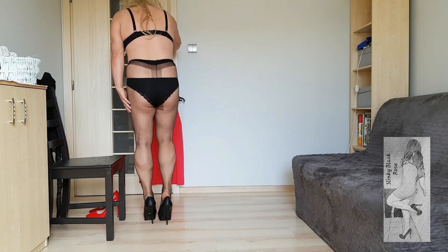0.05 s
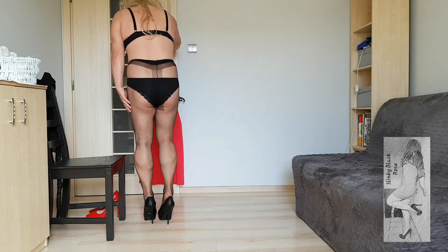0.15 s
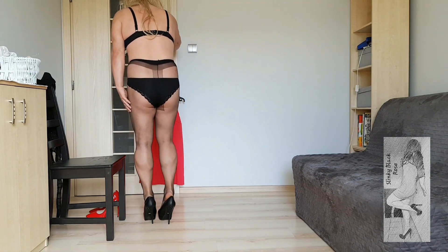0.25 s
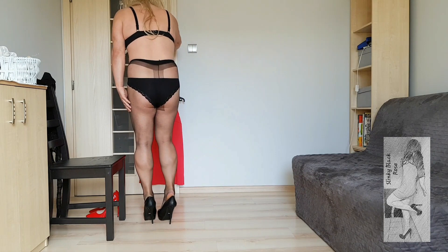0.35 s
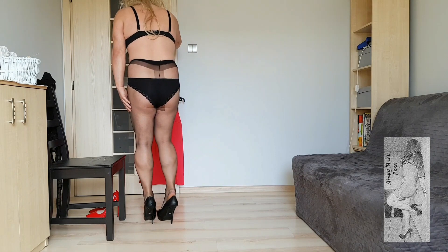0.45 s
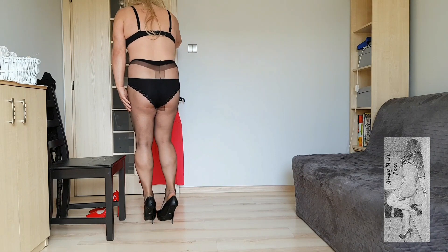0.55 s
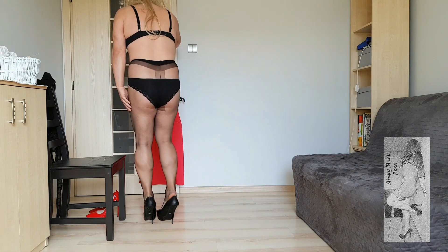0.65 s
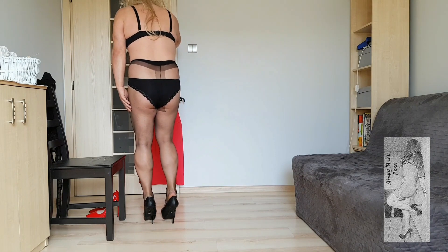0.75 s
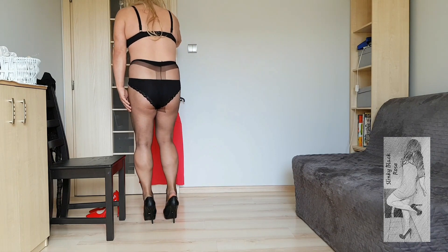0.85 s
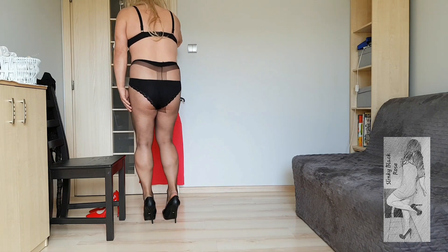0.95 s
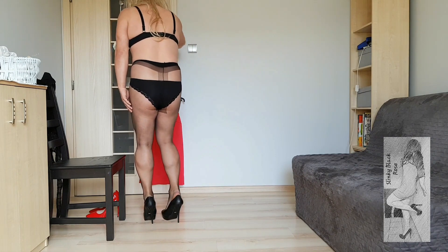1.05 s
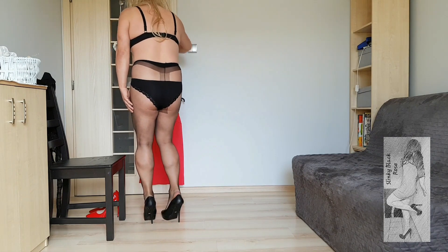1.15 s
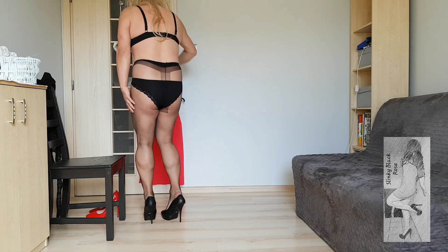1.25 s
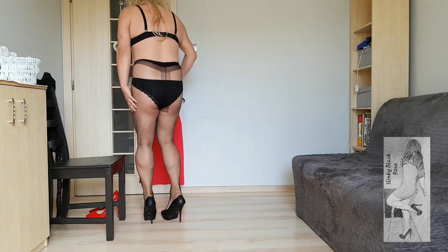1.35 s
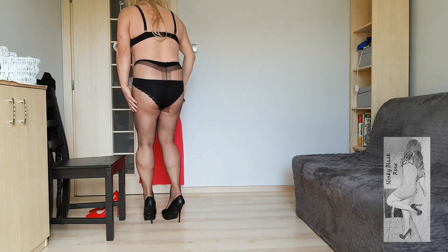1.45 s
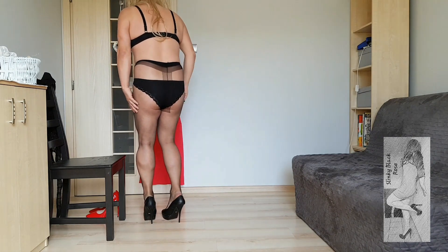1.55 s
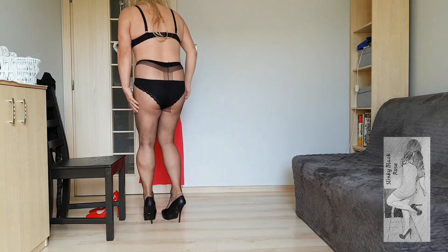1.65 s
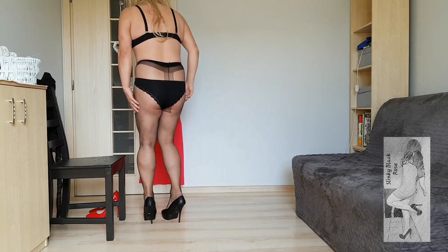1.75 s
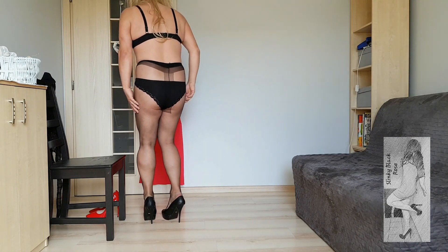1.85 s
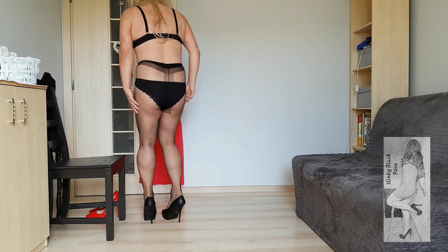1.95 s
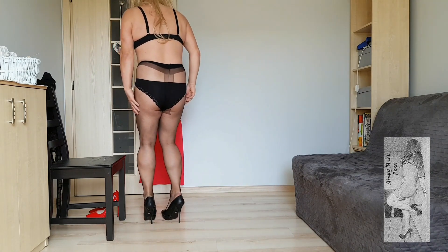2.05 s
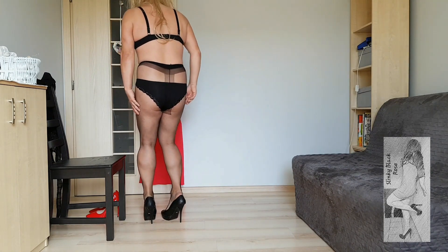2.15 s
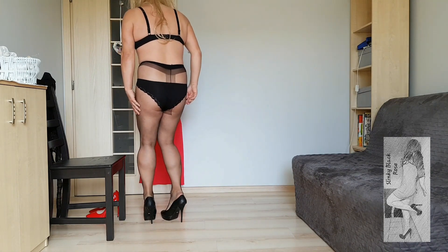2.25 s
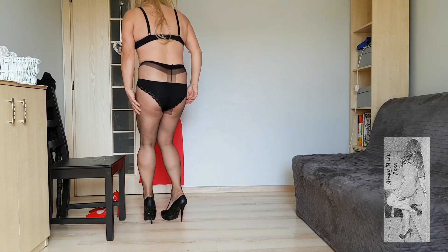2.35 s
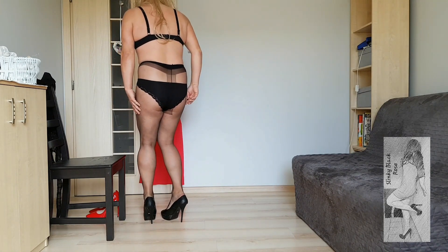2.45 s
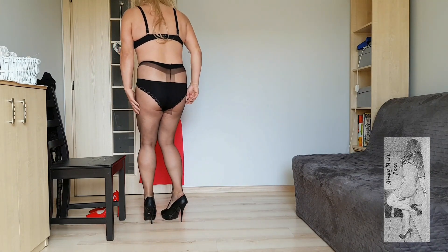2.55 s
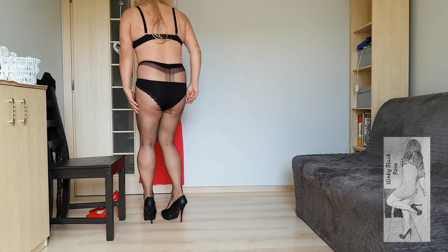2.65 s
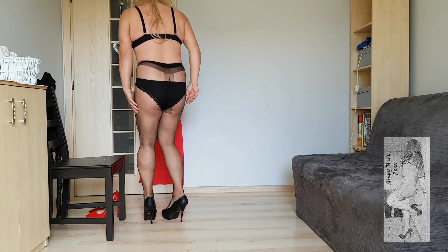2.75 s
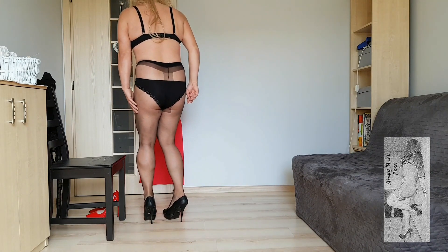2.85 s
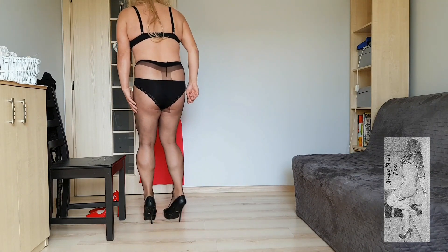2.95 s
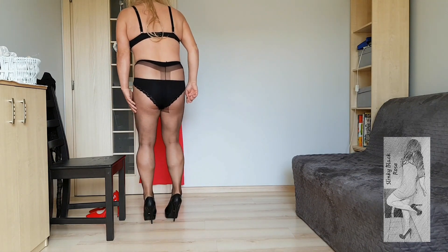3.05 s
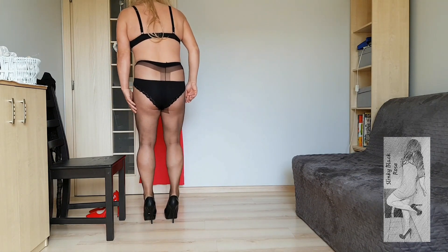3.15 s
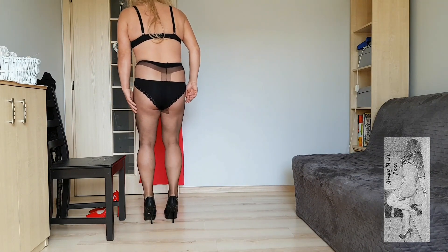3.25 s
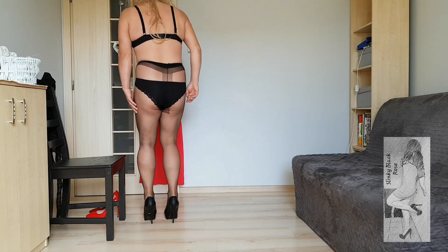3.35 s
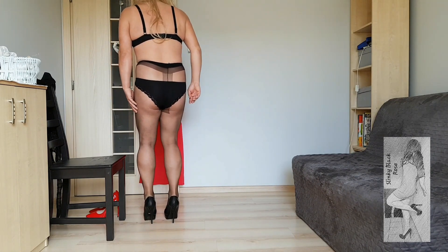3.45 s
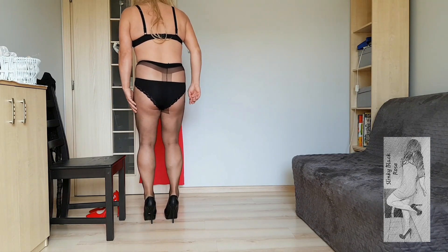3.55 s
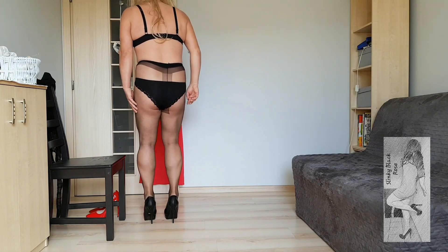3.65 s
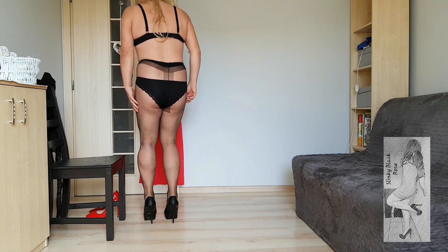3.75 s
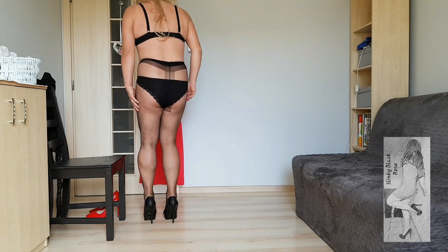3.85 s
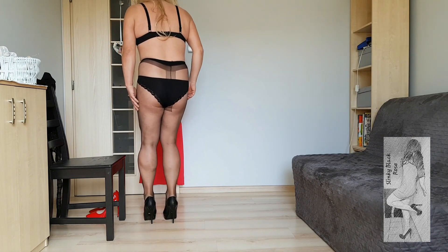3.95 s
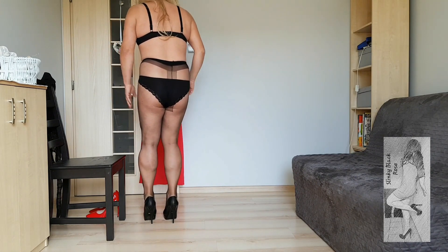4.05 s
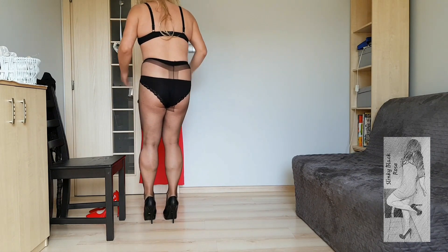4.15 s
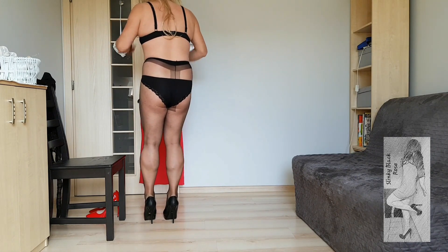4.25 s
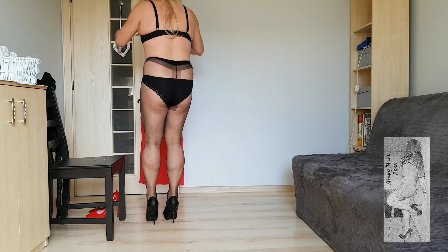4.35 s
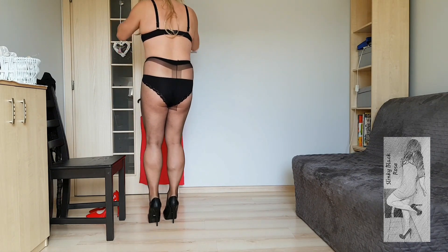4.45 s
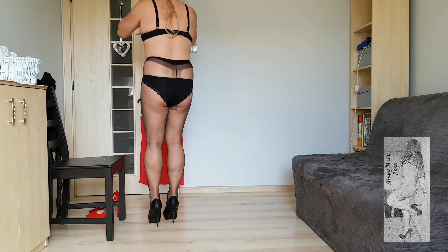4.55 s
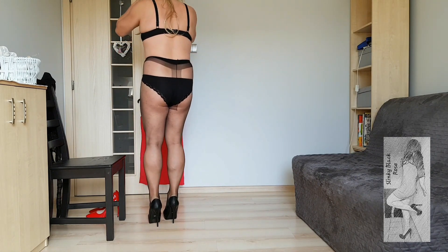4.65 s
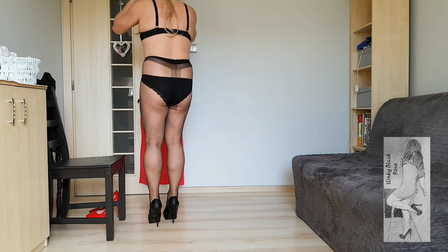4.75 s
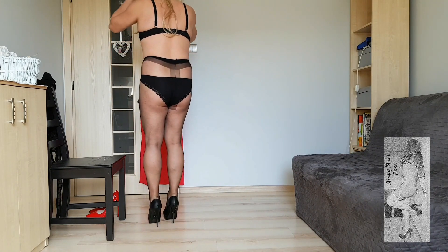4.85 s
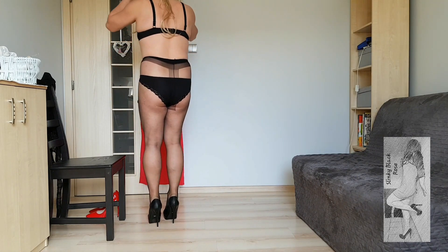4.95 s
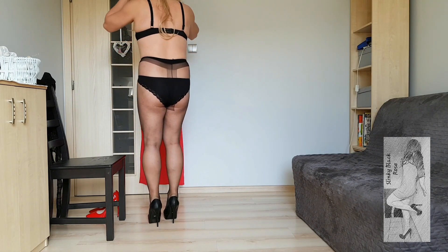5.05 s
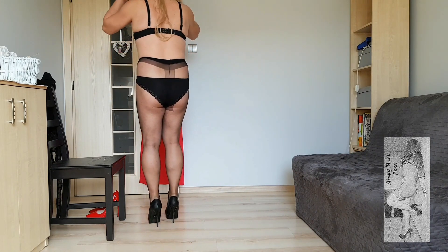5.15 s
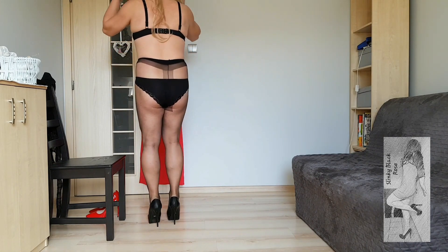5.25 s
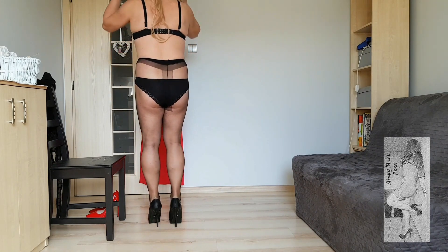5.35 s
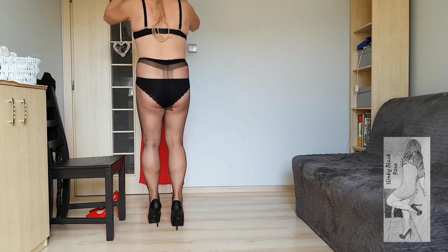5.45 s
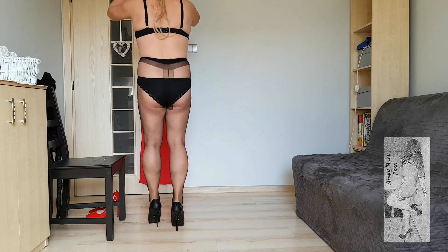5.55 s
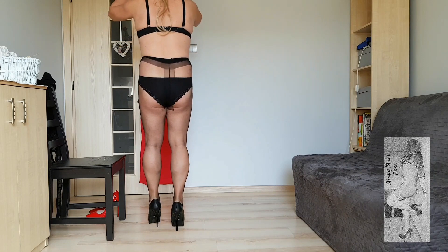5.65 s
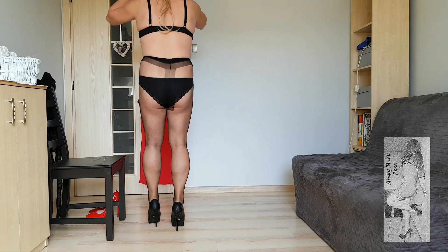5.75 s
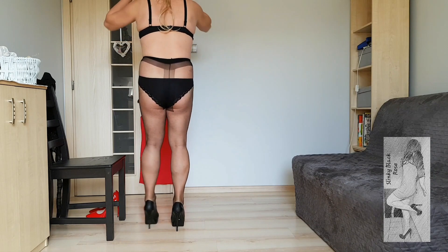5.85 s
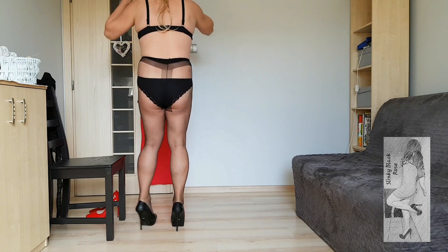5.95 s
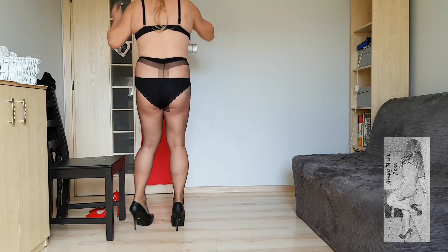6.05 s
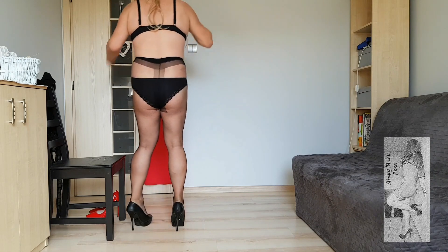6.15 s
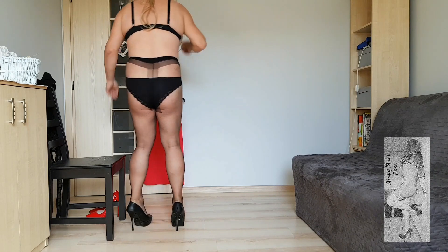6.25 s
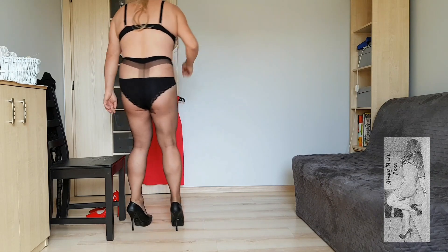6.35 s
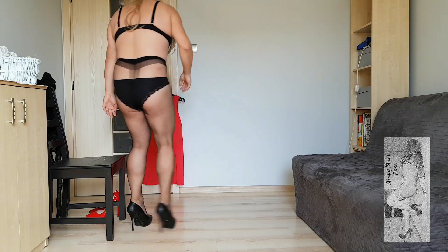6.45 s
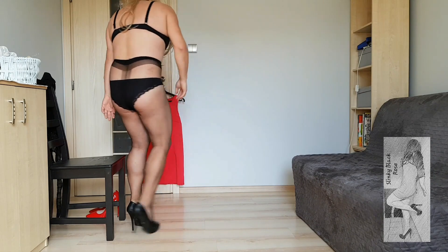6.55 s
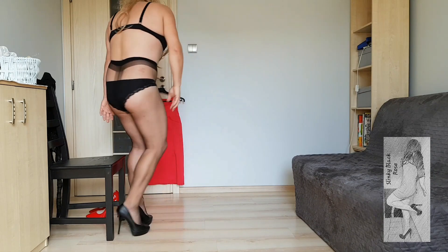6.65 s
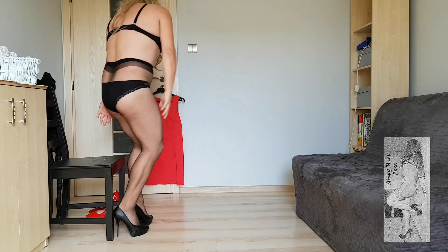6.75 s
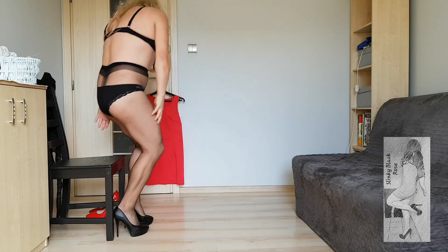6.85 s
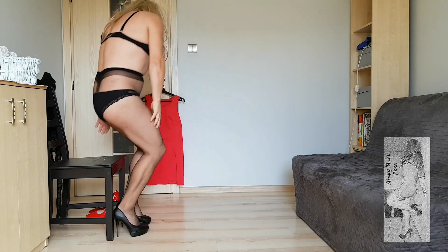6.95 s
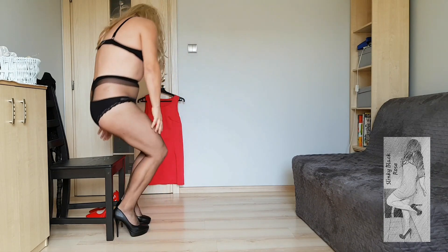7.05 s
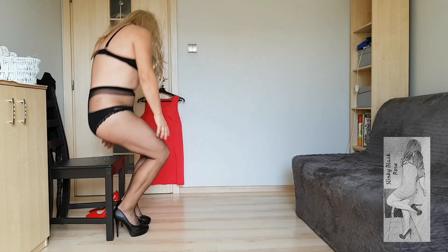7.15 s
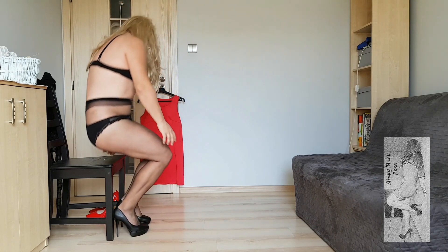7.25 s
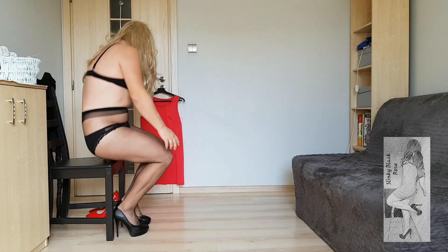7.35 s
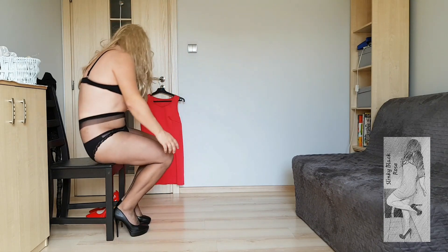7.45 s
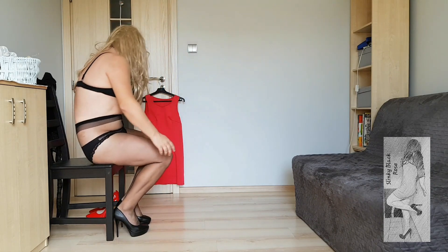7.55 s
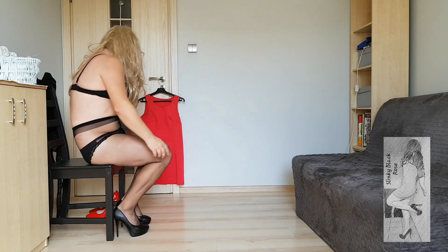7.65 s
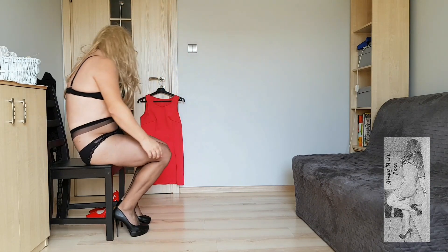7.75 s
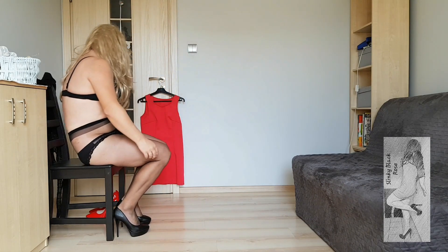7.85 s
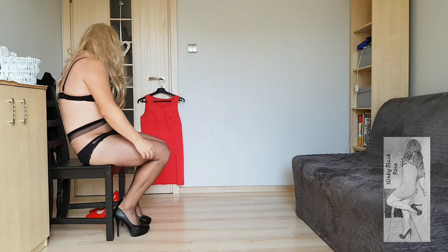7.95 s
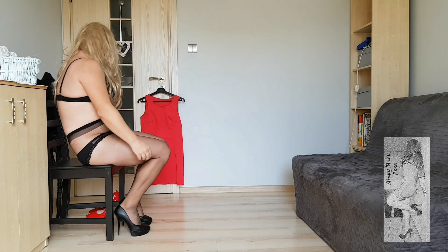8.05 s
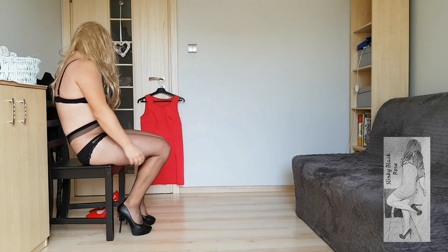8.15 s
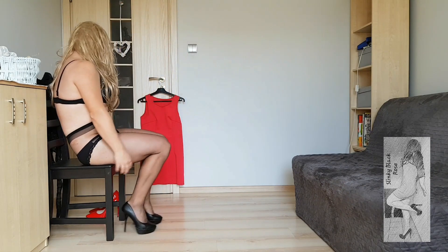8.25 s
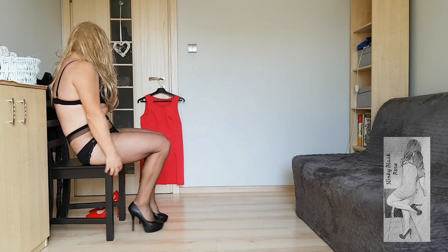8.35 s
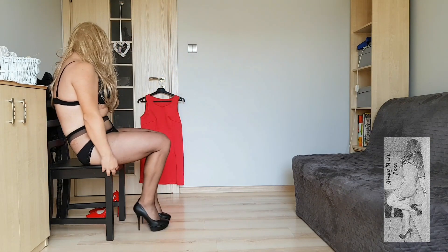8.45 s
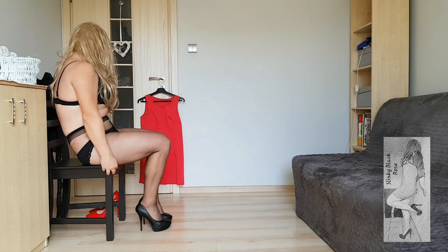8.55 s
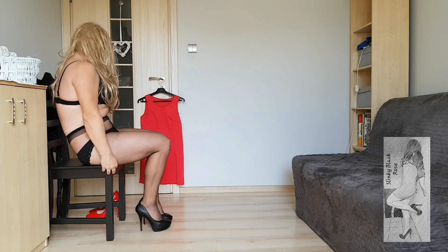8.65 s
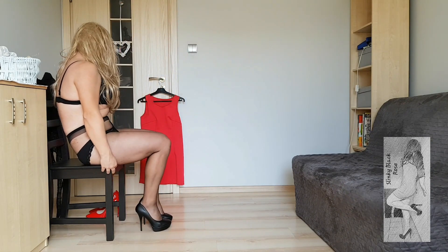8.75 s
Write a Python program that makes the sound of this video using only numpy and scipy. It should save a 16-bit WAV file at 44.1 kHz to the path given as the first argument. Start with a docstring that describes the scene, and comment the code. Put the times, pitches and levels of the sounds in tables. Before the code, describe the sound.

Platform high heels scuff, squeak and knock irregularly on a laminate floor in a small bare room, then a wooden chair groans as someone sits.

```python
"""In a small bare room with a laminate floor, platform high heels shift and step.
Each blow excites damped modes of floor, board and shoe, and the heel tip adds a broadband crack.
Soles scuff, squeak and roll by stick-slip friction; light brushing, probably stockings, only hisses.
Then the wearer sits down: a wooden chair groans and slides, and the last heel blows follow.
Reflections, a diffuse tail and standing waves colour every contact; faint room air lies beneath."""
import sys
import numpy as np
from scipy import signal
from scipy.fft import rfft, irfft, next_fast_len
from scipy.io import wavfile

SR = 44100
rng = np.random.default_rng(int(sys.argv[2]) if len(sys.argv) > 2 else 0)


def pcm_store(signal):
    """Save signal as 16-bit PCM."""
    levels = np.round(np.clip(np.atleast_2d(signal), -1, 1) * 32767)
    wavfile.write(sys.argv[1], SR, levels.astype(np.int16).T)


N = 388124  # samples

# shoe blows: start_s, knock_level_db, then relative to the knock: thud_db, shoe_ring_db
STEPS = [(.065, -64.5, -6, 9.5), (.14, -63.5, 0.5, 3.5), (.66, -57, -15, 8.5), (.906, -56.5, -3.5, -0.5),
         (1.063, -46, 3, 2.5), (1.759, -62.5, -11, -9), (1.982, -57, 1, -1), (2.145, -60.5, -8, 1.5),
         (2.196, -59.5, -1, 8), (2.484, -60, -10, -21), (2.697, -58.5, -4, -28), (3.087, -59.5, 2, -5),
         (3.27, -57.5, -7, -1), (3.311, -25.5, -6.5, -1), (3.643, -72.5, -5, 10.5),
         (3.686, -71.5, -12, 13.5), (3.816, -70.5, 1, 12), (4.136, -68.5, -3, 8.5), (4.434, -74.5, -13, 8),
         (4.615, -59, -4, 2.5), (4.6832, -35.5, -3, -3.5), (5.353, -66.5, -3, 5), (5.583, -52, 2, 6),
         (5.696, -49.5, -14.5, -20), (5.918, -61.5, 8.5, 4), (6.2804, -40, -0.5, -2.5),
         (6.285, -36, -8, -22), (6.548, -52.5, -2, -10), (6.762, -45, -1.5, 0), (6.975, -49.5, 2.5, -2.5),
         (7.104, -49, 1, -16), (7.99, -67, 3, -4), (8.693, -47, 3, -6), (8.702, -36, -2.5, -6.5),
         (8.705, -31, -19, -12)]
# soft treads that flex the floor: start_s, level_db
TREADS = [(1.063, -67), (1.981, -56), (2.012, -54), (3.087, -68), (7.104, -66), (8.702, -55)]
# soles scuffing: peak_s, rise_s, fall_s, board_db, grit_db (drag strengths before a common gain)
SCUFFS = [(.676, 0.014, 0.017, -53, -45), (.797, 0.0062, 0.005, -59.5, -53.5),
          (0.949, .021, 0.029, -61.5, -64), (1.16, 0.029, 0.04, -64.5, -66.5),
          (1.768, 0.0043, 0.0095, -72, -60.5), (1.99, 0.0031, .012, -69, -63.5),
          (2.35, .027, .017, -65, -75), (3.02, .03, 0.053, -79, -71.5), (3.315, 0.00073, 0.0018, -52, -49),
          (3.43, .011, 0.026, -55.5, -54.5), (3.7, 0.029, .018, -68, -64.5), (3.88, .019, 0.023, -61, -59),
          (4.655, 0.02, 0.0068, -73, -62.5), (5.607, 0.021, 0.032, -57.5, -55.5),
          (5.948, .022, 0.0054, -55.5, -63.5), (6.57, .013, 0.0071, -52.5, -59),
          (6.78, 0.0098, 0.03, -51.5, -46.5), (6.955, 0.023, 0.0056, -61, -62),
          (7.03, 0.058, 0.029, -70, -65.5), (8.37, 0.082, 0.032, -68, -67)]
# soles squeaking as they twist: start_s, length_s, settled_slip_rate_hz, tone_db, rasp_db (re tone)
SQUEAKS = [(0.636, 0.042, 968, -44, -13), (.66, 0.069, 1607, -52, -22), (0.784, 0.0079, 3680, -51, -17),
           (6.541, 0.039, 555.6, -46, -10)]
# soles rolling as the weight shifts: start_s, length_s, board_db (before the roll gain), grit_db
ROLLS = [(0, 0.097, -60, -58.5), (.145, .12, -59.5, -65), (0.282, .13, -66, -69.5),
         (0.458, 0.17, -58.5, -69), (1.322, 0.045, -64.5, -75), (1.493, 0.11, -63, -71),
         (2.551, .12, -66, -89), (2.7, 0.14, -64, -75), (2.839, 0.084, -62, -65),
         (8.002, 0.055, -70, -64.5)]
# light brushing, probably stockings: peak_s, rise_and_fall_s, hiss_db (before the common drag gain)
SWISHES = [(.66, 0.01, -52.5), (.797, 0.0073, -61), (1.09, 0.019, -65), (3.05, 0.08, -74), (3.45, .02, -69),
           (3.681, 0.018, -72), (4.19, 0.019, -73), (5.63, 0.042, -70), (6.494, 0.0047, -63.5),
           (7.04, .04, -74), (8.37, 0.13, -77)]
# chair joint slipping under load: start_s, length_s, settled_slip_rate_hz, tone_db, rasp_db (re tone)
GROANS = [(7.481, 0.029, 325.4, -42, -10), (7.647, 0.026, 330.6, -50, -15)]
# chair legs sliding: peak_s, rise_s, fall_s, frame_db, grit_db, hiss_db (before the common drag gain)
CHAIR_SLIDES = [(7.612, 0.002, 0.015, -50, -64, -56.5), (7.668, .015, 0.013, -44, -41, -52.5)]

# modes of the flexing floor, the floor thud, the board, the shoe and the chair frame,
# with strengths relative within each body: pitch_hz, strength_db, t60_s
FLEX_MODES = [(79.5, 10, 0.1), (119.5, 12, 0.1), (172, 0, 0.079)]
THUD_MODES = [(196.6, -8.5, 0.09), (259, -9, 0.19), (314.6, 3, 0.047), (380, -2, 0.015)]
BOARD_MODES = [(414, -25.5, 0.012), (533.5, 4.5, 0.05), (600, 8.5, 0.02), (670, 3.5, 0.038)]
SHOE_MODES = [(736, -9.5, 0.029), (805.6, -1.5, 0.024), (853, -1.5, 0.024), (1010, -7, 0.019),
              (1111, -8, 0.024), (1256, -7.5, 0.025)]
FRAME_MODES = [(1020, 8, 0.019), (1202, 10, 0.015), (1440, 16.5, 0.0074), (1800, 13, 0.0086),
               (2270, 10.5, 0.017), (2957, 5.5, 0.095), (3550, -12, 0.032)]
# relative spectra of the heel tip crack, of gritty friction and of hissing friction: pitch_hz, gain_db
TIP_SPECTRUM = [(600, -39), (1200, 0), (1700, 0.5), (2400, -3.5), (3200, -7.5), (4500, -8.5), (6500, -16.5),
                (9000, -33), (14000, -38)]
GRIT_SPECTRUM = [(200, -13), (500, -11.5), (1200, 0.5), (1800, -2), (2800, -3), (4500, -7.5), (6500, -15.5),
                 (9000, -20), (14000, -21.5)]
HISS_SPECTRUM = [(2000, -53), (4500, 1), (6500, 1), (9000, -2.5), (12500, 2.5), (15000, -11.5)]

# first reflections, relative to the direct path: delay_s, level_db
ECHOES = [(.0045, -10), (.0085, -9), (0.0116, -8), (.016, -9), (0.029, -14), (.038, -7.5)]
# standing waves of the room, relative to one another: pitch_hz, strength_db, t60_s
STANDING = [(116, -12, 0.21), (184.9, 1, 0.38), (215, -3, 0.5), (265.9, 0, 0.46), (281.3, -2.5, 0.6),
            (315.6, -1.5, 0.31), (357, 12.5, 0.14), (393.4, 2.5, 0.38), (453, 2, 0.38), (508, -1, 0.33),
            (533, 6.5, 0.16), (579.8, 8, 0.18), (593, -12, .4), (690, -13.5, 0.36), (724, -3, 0.23),
            (737, -25, 0.18), (794, -11, 0.066), (830, -22, 0.21), (854, -1.5, 0.055), (898, 5, 0.24)]
# relative spectral density of still room air: pitch_hz, density_db
AIR_SPECTRUM = [(20, -37), (30, -23), (41, 7.5), (52, -5.5), (80, -2.5), (112, 0.5), (140, -9), (190, -1),
                (280, -3.5), (380, -4.5), (460, -8.5), (1150, -13), (2300, -16.5), (5000, -23.5),
                (9000, -30.5), (12000, -25.5), (14500, -24.5)]

# crack relative to the knock for a light tap whose shoe ring equals its knock;
# it grows with shoe ring and shrinks with weight, so a heavy blow is duller
CRACK_DB, LIGHT_TAP_DB = -9, -54
CRACK_PER_RING, CRACK_PER_WEIGHT = 0.45, -0.35  # dB per dB
TIP_DIRECT_DB = -5  # direct path of the crack, relative to that of other sounds
SHOE_BEND_S = 0.00039
LEVEL_WINDOW_S = 0.059  # a blow's energy equals its level held for this long

SCUFF_SHOE_DB, SCUFF_HISS_DB = 3, -13.5  # shoe relative to the board, hiss relative to the grit
ROLL_ATTACK_S, ROLL_RELEASE_S = 0.007, 0.015
ROLL_GAIN_DB, ROLL_SHOE_DB = 0.5, -1  # gain of board and shoe; shoe relative to the board
# overshoot is the share by which a slip rate starts above its settled value
SQUEAK = dict(attack_s=0.0063, release_s=0.0066, overshoot=0.224, settle_s=0.0209, jitter=0.04)
GROAN = dict(attack_s=0.015, release_s=0.052, overshoot=0.235, settle_s=0.0108, jitter=0.083)

ROOM_T60_S, ROOM_TREBLE_T60_S = 0.41, 0.39
TAIL_DB, TREBLE_TAIL_DB = -3.5, 0  # before the crossover filters
STANDING_DB, DIRECT_DB = -16, -4.5
AIR_DB = -64
RIGHT_LAG_S, LEFT_BALANCE_DB = .00004, -.4
TOP_HZ = 14550

T = np.arange(N) / SR
RING_T = T[:int(.7 * SR)]  # time axis of every impulse response
LN_1000 = np.log(1000)  # a decay of 60 dB, as an exponent
# decaying complex oscillation of each standing wave
WAVES = np.array([10 ** (db / 20) * np.exp((2j * np.pi * hz - LN_1000 / t60) * RING_T)
                  for hz, db, t60 in STANDING])


def steps():
    """Impact excitation: each blow rings floor, board and shoe in its own proportions and cracks."""
    out = np.zeros((2, N))
    energy = LEVEL_WINDOW_S * SR
    bend = 1 - np.exp(-RING_T / SHOE_BEND_S)  # the shoe takes a moment to bend
    crack = colour(signal.unit_impulse(2048, 32), TIP_SPECTRUM)
    for start, knock_db, thud_db, shoe_db in STEPS:
        spot = room()
        thud = band(modes(THUD_MODES, scatter=1.0), 213, 617)
        board = band(modes(BOARD_MODES, scatter=0.63), 510, 694)
        shoe = band(bend * modes(SHOE_MODES, scatter=0.3), 550, 780)
        for body, relative_db in [(thud, thud_db), (board, 0), (shoe, shoe_db)]:
            dry_body = body[:len(body) // 4]
            add(out, start, undb(knock_db + relative_db) * heard(spot, dry_body, energy))
        # the crack sprays sideways, so more of it arrives by way of the walls
        sideways = spot * np.where(RING_T > 0, 1, undb(TIP_DIRECT_DB))
        weight_db = knock_db - LIGHT_TAP_DB
        crack_db = CRACK_DB + CRACK_PER_RING * shoe_db + CRACK_PER_WEIGHT * weight_db
        add(out, start, undb(knock_db + crack_db) * heard(sideways, crack, energy))
    for start, db in TREADS:
        damped_room = room() * np.exp(-RING_T / 0.13)
        flex = cut(modes(FLEX_MODES), 84, "high")
        add(out, start, undb(db) * heard(damped_room, flex, energy))
    return out


def soles():
    """Sliding friction: soles scuff, squeak and slowly roll on the boards."""
    out = np.zeros((2, N))
    for peak, rise, fall, board_db, grit_db in SCUFFS:
        bodies = [(BOARD_MODES, 350, board_db), (SHOE_MODES, 600, board_db + SCUFF_SHOE_DB)]
        add(out, *slide(peak, rise, fall, bodies, grit_db, grit_db + SCUFF_HISS_DB))
    for squeak in SQUEAKS:
        add(out, *squeal(squeak, SHOE_MODES, **SQUEAK))
    for start, length, board_db, grit_db in ROLLS:
        _, force = press(length, ROLL_ATTACK_S, ROLL_RELEASE_S)
        wood = rub(force, BOARD_MODES, 130) + undb(ROLL_SHOE_DB) * rub(force, SHOE_MODES, 840)
        grit = rasp(force, GRIT_SPECTRUM)
        dry_roll = undb(board_db + ROLL_GAIN_DB) * wood + undb(grit_db) * grit
        add(out, start, heard(room(), dry_roll))
    return out


def chair():
    """Friction under load: a joint groans by regular slips, and sliding legs ring the frame."""
    out = np.zeros((2, N))
    for groan in GROANS:
        add(out, *squeal(groan, FRAME_MODES[:-2], **GROAN))  # without the two highest modes
    for peak, rise, fall, frame_db, grit_db, hiss_db in CHAIR_SLIDES:
        add(out, *slide(peak, rise, fall, [(FRAME_MODES, 400, frame_db)], grit_db, hiss_db))
    return out


def stockings():
    """Non-resonant friction: cloth brushes past cloth, with hiss but no body and no grit."""
    out = np.zeros((2, N))
    for peak, width, hiss_db in SWISHES:
        add(out, *slide(peak, width, width, [], -np.inf, hiss_db))
    return out


def slide(peak, rise, fall, bodies, grit_db, hiss_db):
    """Transient friction: a drag rings its bodies (modes, lowest Hz, dB), rasps and hisses."""
    lead = 5 * rise
    since_peak = RING_T - lead
    force = np.exp(-np.where(since_peak < 0, -since_peak / rise, since_peak / fall))
    parts = [(rub(force, body, low_hz), db) for body, low_hz, db in bodies]
    parts.append((rasp(force, GRIT_SPECTRUM), grit_db))
    parts.append((rasp(force, HISS_SPECTRUM), hiss_db))
    mix = sum(undb(db) * unit(part) for part, db in parts)
    drag = 2 * mix * np.sqrt(np.sum(force ** 2))  # 2 is the gain common to all drags
    return peak - lead, heard(room(), drag)


def squeal(event, body, attack_s, release_s, overshoot, settle_s, jitter):
    """Regular stick-slip: a wavering tone sags to its pitch while every slip ticks a body."""
    start, length, settled_hz, db, rasp_db = event
    t, force = press(length, attack_s, release_s)
    hz = settled_hz * (1 + overshoot * np.exp(-t / settle_s))
    wobble = cut(rng.standard_normal(len(t)), 300, "low")
    cycles = np.cumsum(hz * (1 + jitter * wobble / np.std(wobble))) / SR
    ticks = np.diff(np.floor(cycles), prepend=0)  # one impulse per completed cycle
    creak = cut(ring(ticks, modes(body)), 3800, "low")
    tone = np.sqrt(2) * np.sin(2 * np.pi * cycles)
    voice = tone + undb(rasp_db) * creak / np.std(creak)
    return start, heard(room(), undb(db) * force * voice)


def press(length, attack_s, release_s):
    """Contact loading: force builds linearly, holds until its length is up, then decays."""
    t = np.arange(0, length + 6 * release_s, 1 / SR)
    build = np.minimum(t / attack_s, 1)
    return t, build * np.exp(-np.maximum(t - length, 0) / release_s)


def rub(force, body, low_hz):
    """Resonant friction: irregular slips drive the modes of a body."""
    response = band(modes(body, scatter=0.78), low_hz, 1.35 * body[-1][0])
    return ring(force * slips(len(force)), unit(response))


def rasp(force, spectrum):
    """Granular friction: dense fine slips under a sliding surface, shaped by a spectrum."""
    return colour(force * slips(len(force), rate_hz=7000, spread_db=2.0), spectrum)


def slips(size, rate_hz=2500, spread_db=4):
    """Irregular stick-slip: a random train of uneven tiny impulses, scaled to rms 1."""
    sign, strength = rng.standard_normal((2, size))
    happens = rng.random(size) < rate_hz / SR
    train = happens * np.sign(sign) * undb(spread_db * strength)
    return train / np.std(train)


def modes(table, scatter=0.):
    """Modal superposition: damped sines; scatter (dB) varies strengths and, slightly, pitches."""
    out = 0
    draws = rng.standard_normal((len(table), 2))  # the contact point differs from blow to blow
    for (hz, db, t60), (strength, detune) in zip(table, draws):
        decay = np.exp(-LN_1000 * RING_T / t60)
        pitch_hz = hz * (1 + 0.016 * scatter * detune)
        out = out + undb(db + scatter * strength) * decay * np.sin(2 * np.pi * pitch_hz * RING_T)
    return unit(out)


def room():
    """Room acoustics from one floor spot: direct path, near walls, diffuse tail, standing waves."""
    build = 1 - np.exp(-(RING_T / 0.0029) ** 2)
    noise = diffuse(len(RING_T)) * build
    low = undb(TAIL_DB) * unit(noise * np.exp(-LN_1000 * RING_T / ROOM_T60_S))
    high = undb(TREBLE_TAIL_DB) * unit(noise * np.exp(-LN_1000 * RING_T / ROOM_TREBLE_T60_S))
    walls = np.zeros_like(noise)
    for (delay, db), (shift, side) in zip(ECHOES, rng.uniform(-1, 1, (len(ECHOES), 2))):
        between_mics = 0.00027 * side * np.array([1, -1])
        lags = SR * (delay * (1 + .12 * shift) + between_mics)
        walls[[0, 1], lags.astype(int)] += undb(DIRECT_DB + db)
    out = cut(low, 1640, "low", order=1) + cut(high, 1350, "high", order=1)
    out += cut(walls, 4940, "low", order=1)
    out[:, 0] += undb(DIRECT_DB)
    # each spot meets the standing waves in other phases; microphones differ more at short wavelengths
    phase, apart = rng.uniform(-np.pi, np.pi, (2, len(STANDING)))
    mic_phase = np.outer([.5, -.5], apart * np.array(STANDING)[:, 0] / 1300)
    standing = (np.exp(1j * (phase + mic_phase)) @ WAVES).imag * build
    return out + undb(STANDING_DB) * unit(standing)


def heard(spot, x, energy=None):
    """Convolution with the room: a dry sound at both microphones, at the given energy or its own."""
    wet = signal.fftconvolve(x[None], spot, axes=1)
    target = np.sum(x ** 2) if energy is None else energy
    return wet * np.sqrt(2 * target / np.sum(wet ** 2))


def diffuse(size, alike_hz=750):
    """Diffuse-field coherence: noise at two microphones, alike in the bass, unrelated in the treble."""
    mid, side = rfft(rng.standard_normal((2, size)))
    alike = .9 / (1 + (np.fft.rfftfreq(size, 1 / SR) / alike_hz) ** 4)
    mid = mid * np.sqrt((1 + alike) / 2)
    side = side * np.sqrt((1 - alike) / 2)
    return irfft(np.array([mid + side, mid - side]), size)


def air():
    """Stationary diffuse noise: the faint steady rumble and hiss of the room."""
    noise = diffuse(next_fast_len(N))[:, :N]
    return undb(AIR_DB) * colour(noise, AIR_SPECTRUM)


def undb(db):
    """Logarithmic level: decibels to amplitude gain."""
    return 10 ** (np.asarray(db) / 20)


def unit(x):
    """Energy normalisation: each channel is scaled to unit energy."""
    return x / np.sqrt(np.sum(x ** 2, axis=-1, keepdims=True))


def colour(x, points):
    """Spectral shaping: interpolate (Hz, dB) points over log frequency, keeping white-noise power."""
    hz, db = np.transpose(points)
    size = next_fast_len(x.shape[-1])
    bins = np.log(np.fft.rfftfreq(size, 1 / SR) + 1)  # 1 Hz offset avoids log of zero
    gain = undb(np.interp(bins, np.log(hz), db))
    gain = gain / np.sqrt(np.mean(gain ** 2))
    return irfft(rfft(x, size) * gain, size)[..., :x.shape[-1]]


def cut(x, hz, kind, order=2):
    """Butterworth filtering: a maximally flat low- or high-pass."""
    return signal.sosfilt(signal.butter(order, hz, kind, fs=SR, output="sos"), x)


def band(x, low_hz, high_hz):
    """Band limiting: a high-pass followed by a low-pass."""
    return cut(cut(x, low_hz, "high"), high_hz, "low")


def ring(x, response):
    """Linear resonance: a driving signal convolved with an impulse response."""
    return signal.fftconvolve(x, response)[:len(x)]


def add(out, start_s, x):
    """Superposition: mix x in at its start time."""
    i = max(int(start_s * SR), 0)
    out[:, i:i + x.shape[1]] += x[:, :max(N - i, 0)]


def scene():
    """Interchannel delay: contact sounds reach the right microphone slightly later, over room air."""
    left, right = steps() + soles() + stockings() + chair()
    late_right = np.interp(T - RIGHT_LAG_S, T, right)
    return np.array([undb(LEFT_BALANCE_DB) * left, late_right]) + air()


def record(dry):
    """Band limitation: the recorder's steep elliptic low-pass removes the extreme treble."""
    return signal.sosfilt(signal.ellip(10, .2, 70, TOP_HZ, fs=SR, output="sos"), dry)


dry = scene()
out = record(dry)
pcm_store(out)
```